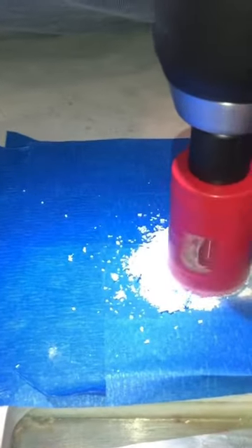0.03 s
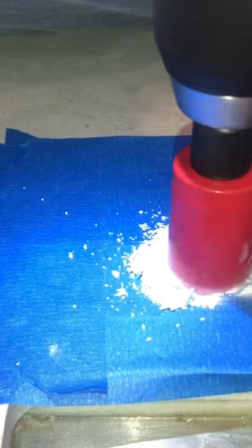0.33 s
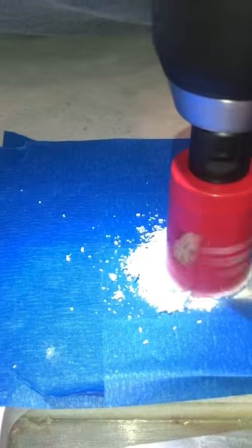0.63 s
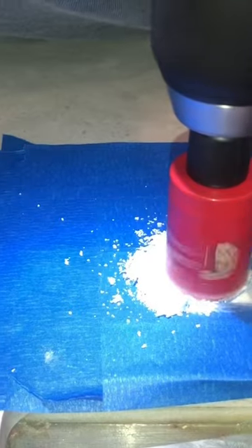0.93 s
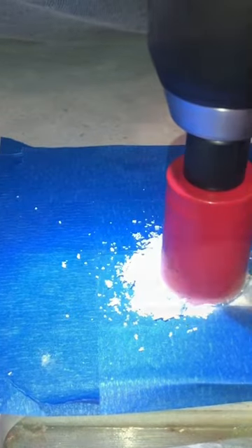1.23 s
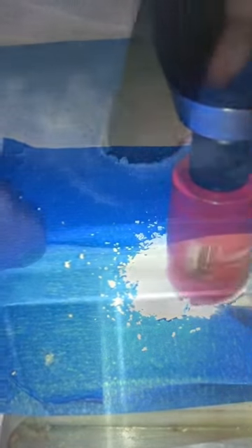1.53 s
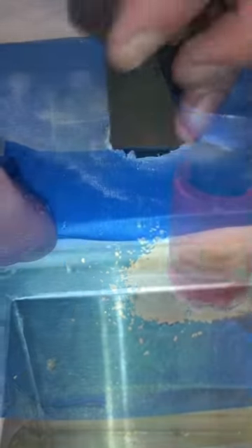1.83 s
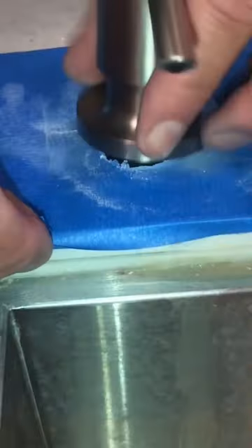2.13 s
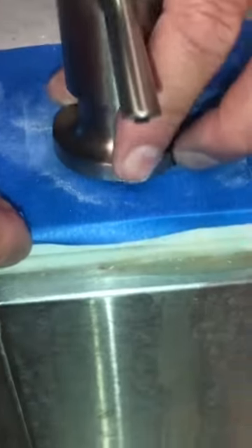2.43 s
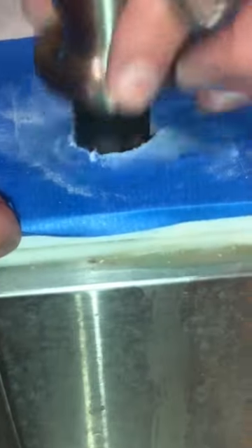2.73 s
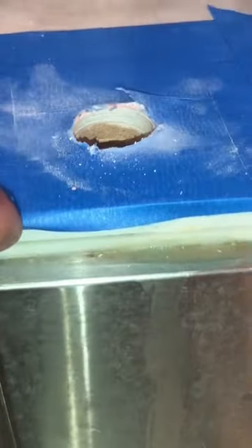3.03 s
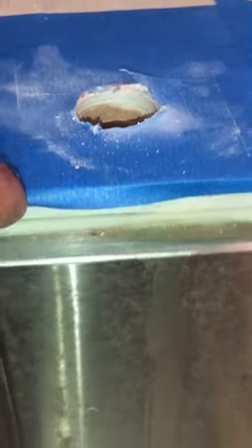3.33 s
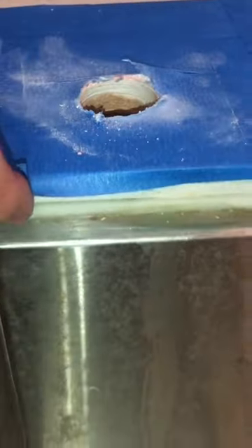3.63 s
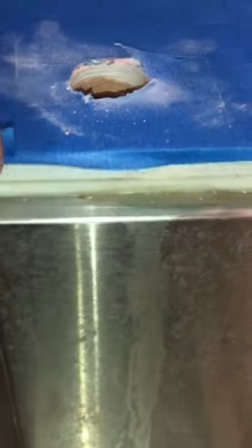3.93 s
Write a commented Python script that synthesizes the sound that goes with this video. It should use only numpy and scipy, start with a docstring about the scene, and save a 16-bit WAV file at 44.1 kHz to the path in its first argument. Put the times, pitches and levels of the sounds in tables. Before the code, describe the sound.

A power drill grinds through a countertop and fades, then a metal faucet knocks and clinks.

```python
"""A power drill grinds a hole saw through a countertop, slowing once a turn where the saw binds, then fades.
Its motor and gears whine at multiples of the shaft speed; abrasion gives noise and rings the saw's cup.
A steel faucet is set into the hole, scrapes back out and is put down with a few clinks: each impact
excites damped modes of slab, rim and steel, and the room reverberates briefly.
Under it lie quiet room noise and a faint falling whine, like a motor coasting down."""
import sys
import numpy as np
from scipy import signal
from scipy.fft import rfft, irfft, next_fast_len
from scipy.io import wavfile
from scipy.ndimage import uniform_filter1d, map_coordinates

SR = 44100
rng = np.random.default_rng(int(sys.argv[2]) if len(sys.argv) > 2 else 0)


def to_wav(sig):
    """Store sig (one row per channel, or 1-D mono) as 16-bit WAV at the path in sys.argv[1].

    Samples outside -1..1 are clipped; the rate is SR.
    """
    pcm = np.clip(np.atleast_2d(sig), -1, 1) * 32767
    pcm = np.round(pcm).astype(np.int16)
    wavfile.write(sys.argv[1], SR, pcm.T)  # frames by channels


N = 176400
TIME = np.arange(N) / SR

# spectrum of the room noise (frequency [Hz], relative level [dB])
AMBIENT_SPECTRUM = [(25, -15), (50, -6.5), (78, 2), (170, -5), (350, -11), (600, -12.5), (1500, -17.5),
                    (2300, -26.5), (5000, -30.5), (7000, -36.5), (16000, -42.5)]
# envelope of the room noise (time [s], level [dB])
AMBIENT_LEVEL = [(2.3, -52.5), (4, -54.5)]
# two falling whines, the second fainter; each lists (time [s], frequency [Hz], level [dB])
WHINE_GLIDES = [
    [(2.2, 1793, -58), (2.5, 1444, -53.5), (2.72, 1160, -60)],
    [(2.95, 1950, -74), (3.13, 1690, -61.5), (3.35, 1347, -78)],
]
# reverberation time (frequency [Hz], t60 [s])
ROOM_DECAY = [(150, 0.19), (2000, 0.31), (6000, 0.22), (14000, 0.087)]

# modes of the countertop, the hole's rim and the faucet (frequency [Hz], relative level [dB], t60 [s])
SLAB_MODES = [(110, -13.5, 0.14), (267, -4, 0.13), (369, -2.5, 0.14), (558, -7, 0.056)]
RIM_MODES = [(644, 3.5, 0.035), (973, -2.5, 0.07), (1205, -9, 0.053), (1520, -3.5, 0.052),
             (1840, -6, 0.029), (2310, -3.5, 0.041), (2507, -1, 0.033), (2970, -14, 0.025)]
STEEL_MODES = [(4270, -11, .07), (4600, -4, 0.067), (4950, -6.5, 0.13), (5300, -5, 0.09),
               (8170, -1.5, 0.061), (10970, -7.5, 0.026), (14600, -2, .035)]
# faucet impacts (time [s], thud gain [dB], clack gain [dB], tick gain [dB], contact brightness [Hz])
IMPACTS = [(2.19, -29, -34.5, -53, 910), (2.232, -36, -34, -26, 3600), (2.708, -28, -37, -37, 900),
           (2.776, -32, -23, -36.5, 1600), (2.7931, -22.5, -13.5, -23, 2010),
           (2.823, -22.5, -7, -18.5, 2070), (2.826, -32, -14.5, -43, 756), (2.87, -61, -31, -29.5, 2720),
           (3.216, -65, -44, -46, 2600), (3.3955, -53, -26, -10, 4300), (3.408, -41, -27, -16.5, 2010),
           (3.417, -27, -18.5, -23, 850), (3.4594, -43, -16, -9.5, 2400), (3.485, -48, -29, -25, 2300),
           (3.497, -34.5, -21.5, -46, 906), (3.547, -34, -16.5, -18, 1930), (3.551, -37, -15.5, -50, 670),
           (3.6128, -61, -29.5, -31, 2550)]
# clinks that leave the steel free to ring (time [s], gain [dB])
FREE_CLINKS = [(3.3951, -16), (3.407, -23)]
# the thread rasps over the rim (start [s], duration [s], gain [dB])
THREAD_RASPS = [(2.796, .024, -22.5)]
# dry slips as the shank starts to move (time [s], gain [dB])
SHANK_SLIPS = [(2.752, -8.5), (2.7568, 1), (2.766, -10), (2.781, -17), (2.790, -3)]
# fingers and steel rub on tape and counter (midpoint [s], half width [s], level [dB], centre [Hz])
RUB_STROKES = [(2.125, 0.02, -43.5, 298), (2.2, 0.1, -43.5, 150), (2.21, .04, -52, 10000),
               (2.704, 0.031, -51.5, 8750), (2.7, 0.026, -42.5, 328), (2.774, 0.027, -35.5, 10000),
               (2.813, 0.015, -28.5, 6510), (2.858, 0.027, -51, 1390), (3.414, 0.007, -37.5, 7950),
               (3.465, 0.05, -44.5, 5200), (3.815, 0.017, -56.5, 1550), (3.912, 0.011, -55.5, 11050),
               (3.985, 0.018, -56, 9040)]

# envelope of the drill (time [s], gain [dB])
DRILL_LEVEL = [(0, -16), (.1, -14), (1.25, -14.5), (1.5, -17.5), (1.75, -21.5), (1.98, -26.5), (2.12, -35),
               (2.28, -66)]
# motor speed (time [s], mean shaft rate [Hz], swing within a saw turn [Hz])
SHAFT_SPEED = [(0, 289.3, 4.5), (.45, 288.5, 4.2), (1.25, 291.3, 2), (2.1, 289.5, 1.7)]
# motor and gear whine (multiple of shaft rate [1], relative level [dB], swell on binding [dB])
SHAFT_ORDERS = [(2, -24.3, 0), (11, -15.5, 0), (11.8, -23, 1), (21, -16, -1), (22.5, -20, 3.5)]
# housing hum, then speed controller whistle (frequency [Hz], relative level [dB], wander [Hz], flutter [dB])
STEADY_TONES = [(182.6, -19, 3.4, 2.6), (3917.7, -14.3, 1.5, 1.3)]
# squeals where the saw binds hardest (midpoint [s], relative level [dB])
SAW_SQUEALS = [(.09, -7), (.315, -10), (.8, -12), (1.02, -10.5), (1.23, -9.5)]
# spectra of the cut and of its low rumble (frequency [Hz], relative level [dB])
GRIND_SPECTRUM = [(700, -13), (830, -4), (1050, -5.5), (1250, -3), (1400, -4.5), (2000, -6), (2300, -3),
                  (2600, -2.5), (3000, -8.5), (3400, -5.5), (3750, -8.5), (4200, -5.5), (4600, -10.5),
                  (5600, -9.5), (6400, -7), (7600, -10), (9000, -11), (9800, -8.5), (10400, -15.5),
                  (13500, -14), (14700, -8), (16000, -23.5)]
RUMBLE_SPECTRUM = [(40, -33), (75, -13), (120, -7), (175, -2), (210, -6.5), (245, -1), (280, -6),
                   (355, 4.5), (415, -9), (540, -5.5), (720, -10), (900, -21), (1500, -51.5)]
# resonances of the saw's cup (frequency [Hz], width [octaves], relative level [dB], surge [dB])
CUP_RESONANCES = [(1220, 0.055, -17, 4), (2413, 0.13, -10.5, 2.5), (4230, 0.039, -16, 1.5)]


def amp(db):
    """Decibels to amplitude ratio."""
    return 10 ** (np.asarray(db) / 20)


def unit(x):
    """Normalisation to rms 1."""
    return x / np.sqrt(np.mean(x ** 2) + 1e-20)


def along(points, hz):
    """Interpolation of (frequency, value) points on a log axis."""
    f, values = np.transpose(points)
    return np.interp(np.log(hz + 1), np.log(f + 1), values)


def curves(rows):
    """Linear interpolation in time of each column after the first."""
    times, *columns = np.transpose(rows)
    return [np.interp(TIME, times, column) for column in columns]


def random_spline(positions):
    """Spline interpolation between Gaussian values, one at each whole position."""
    return map_coordinates(rng.standard_normal(N // 20), [positions], mode="mirror")


def wobble(rate):
    """Smooth random modulation, rate knots a second."""
    return random_spline(TIME * rate)


def filtered(x, response):
    """Filtering as multiplication of the spectrum by a frequency response."""
    n = x.shape[-1]
    size = next_fast_len(n + 8192)
    return irfft(rfft(x, size) * response(np.fft.rfftfreq(size, 1 / SR)), size)[..., :n]


def noise(response):
    """Spectrally shaped noise of rms 1."""
    return unit(filtered(rng.standard_normal(N), response))


def band(centre_hz, octaves):
    """A Gaussian band-pass response on log frequency."""
    return lambda f: np.exp(-.5 * (np.log2((f + 1) / centre_hz) / octaves) ** 2)


def tone(hz):
    """A sine of rms 1 whose phase is the integral of its frequency."""
    return np.sqrt(2) * np.sin(2 * np.pi * (np.cumsum(hz) / SR + rng.random()))


def add(out, start_s, x):
    """Superposition of x on out from start_s."""
    i = round(start_s * SR)
    out[i:i + len(x)] += x[:max(N - i, 0)]


def room_noise():
    """Broadband ambient noise, strongest in the bass, with a thin narrowband hiss."""
    level_db, = curves(AMBIENT_LEVEL)
    floor = noise(lambda f: amp(along(AMBIENT_SPECTRUM, f))) * amp(level_db + .6 * wobble(5.8))
    return floor + amp(-79.5) * noise(band(9020, octaves=.016))


def falling_whines():
    """Fluttering downward glides; random frequency modulation blurs their three harmonics."""
    out = np.zeros(N)
    for glide in WHINE_GLIDES:
        hz, db = curves(glide)
        gate = uniform_filter1d(1. * ((TIME > glide[0][0]) & (TIME < glide[-1][0])), size=2000)
        fundamental = tone(hz + 12 * wobble(250))
        overtones = sum(tone(k * (hz + 90 * wobble(500))) for k in (2, 3))
        out += gate * (fundamental + amp(-17.5) * overtones) * amp(db + 3.2 * wobble(50))
    return out


def reverberation(x):
    """Convolution with a diffuse, exponentially decaying tail; the highest treble dies first."""
    hz, t, spectrum = signal.stft(rng.standard_normal(SR // 2), SR, nperseg=256)
    decay = amp(-60 * t / along(ROOM_DECAY, hz)[:, None])
    _, tail = signal.istft(spectrum * decay, SR, nperseg=256)
    delayed = np.pad(x, (SR // 200, 0))
    return signal.fftconvolve(delayed, tail / np.linalg.norm(tail))[:N]


def burst(t60, hz, octaves):
    """A contact transient: decaying band noise, coloured by the point of contact."""
    t = np.arange(SR // 4) / SR
    ripple_db, ripple_spacing_hz = 3.5, 350
    colour = lambda f: band(hz, octaves)(f) * amp(ripple_db * random_spline(f / ripple_spacing_hz))
    envelope = amp(-60 * t / t60) * (1 - np.exp(-t * hz))
    return unit(filtered(rng.standard_normal(len(t)), colour)) * envelope


def ring(modes, t60_scale=1, detune=0, relative_linewidth=.01):
    """Modal vibration: damped sines with phase diffusion, weighted anew by each contact."""
    t = np.arange(SR // 4) / SR
    out = np.zeros(len(t))
    for hz, db, t60 in modes:
        envelope = amp(db + rng.normal(0, 2.2) - 60 * t / (t60 * t60_scale)) * (1 - np.exp(-t * hz))
        shifted_hz = hz * (1 + detune * rng.normal())
        drift = np.cumsum(rng.standard_normal(len(t))) * np.sqrt(relative_linewidth * hz / SR / (2 * np.pi))
        out += envelope * np.sin(2 * np.pi * (shifted_hz * t + drift + rng.random()))
    return out


def knock(thud_db, clack_db, tick_db, hz):
    """Impact excites slab, rim and hand-damped steel; a harder contact is brighter."""
    grip_detune = .04
    thud = ring(SLAB_MODES) + amp(-5.5) * burst(t60=.051, hz=400, octaves=.9)
    clack = ring(RIM_MODES, detune=grip_detune) + amp(8.5) * burst(t60=.02, hz=hz, octaves=.51)
    held_steel = amp(-4.5) * ring(STEEL_MODES, t60_scale=.2, detune=grip_detune)
    tick = held_steel + burst(t60=.024, hz=2.3 * hz, octaves=.6)
    return amp(thud_db) * thud + amp(clack_db - 14.5) * clack + amp(tick_db - 6.5) * tick


def faucet(ridges_per_s=230):
    """Impact and friction: knocks, free clinks, the thread's train of small impacts, slips and rubs."""
    out = np.zeros(N)
    for s, thud_db, clack_db, tick_db, hz in IMPACTS:
        add(out, s, knock(thud_db, clack_db, tick_db, hz))
    for s, db in FREE_CLINKS:
        add(out, s, amp(db) * ring(STEEL_MODES))
    for start, duration, db in THREAD_RASPS:
        for s in np.arange(start, start + duration, 1 / ridges_per_s):
            onset = s + rng.normal(0, .00031)
            add(out, onset, knock(db - 8.5, db + 6.5, db - 18, hz=1400 * 2 ** rng.normal(0, .68)))
    for s, db in SHANK_SLIPS:
        add(out, s, amp(db) * burst(t60=.0016, hz=9600, octaves=.99))
    for s, width, db, hz in RUB_STROKES:
        friction = noise(band(hz, octaves=.87)) * amp(db + 3.1 * wobble(400))
        out += friction * np.exp(-((TIME - s) / width) ** 2)
    return out


def shaft_motion(turn_s=.232, fastest_s=.05, bind_lag_s=.035):
    """Periodic loading modulates the shaft rate once a saw turn; returns that rate and the binding cycle."""
    mean_hz, swing_hz = curves(SHAFT_SPEED)
    angle = 2 * np.pi * (TIME - fastest_s) / turn_s
    lopsided_cycle = np.cos(angle) + .3 * np.cos(2 * angle)
    shaft_hz = mean_hz + swing_hz * lopsided_cycle + .4 * wobble(40)
    bind = np.cos(angle - 2 * np.pi * bind_lag_s / turn_s) * swing_hz / swing_hz.max()
    return shaft_hz, bind


def motor(shaft_hz, bind):
    """Forced vibration: motor and gear orders track the shaft; housing and controller tones do not."""
    whine = sum(tone(order * shaft_hz) * amp(db + swell * bind + 1.6 * wobble(35))
                for order, db, swell in SHAFT_ORDERS)
    steady = sum(tone(hz + wander * wobble(35)) * amp(db + flutter * wobble(30))
                 for hz, db, wander, flutter in STEADY_TONES)
    return whine + steady


def saw_squeal(shaft_hz, order=22.5, blur_hz=45, half_width_s=.03):
    """Friction of the binding saw gives short, rough tones at a multiple of the shaft rate."""
    envelope = sum(amp(db) * np.exp(-((TIME - s) / half_width_s) ** 2) for s, db in SAW_SQUEALS)
    return tone(order * shaft_hz + blur_hz * wobble(400)) * envelope


def grinding(bind):
    """Abrasion: grit scours the kerf in fast uneven bites and excites the resonances of the saw's cup."""
    cut = lambda f: amp(along(GRIND_SPECTRUM, f)) / (1 + (740 / (f + 1)) ** 12)
    lowpass = lambda f: 1 / np.sqrt(1 + (f / 4200) ** 6)
    highpass = lambda f: np.sqrt(1 - lowpass(f) ** 2)
    housing_hz = STEADY_TONES[0][0]
    chatter = tone(housing_hz + 3 * wobble(12))
    bite = amp(.3 * bind + .51 * wobble(28) + .3 * wobble(500) + .5 * chatter)
    scour = noise(lambda f: cut(f) * lowpass(f)) * amp(-3)
    cup = sum(noise(band(hz, width)) * amp(db + surge * wobble(18))
              for hz, width, db, surge in CUP_RESONANCES)
    hiss = noise(lambda f: cut(f) * highpass(f)) * amp(-5 + .7 * bind + 1.3 * wobble(1100))
    rumble = noise(lambda f: amp(along(RUMBLE_SPECTRUM, f))) * amp(-14 + wobble(22))
    return bite * (scour + cup) + hiss + rumble


def drill():
    """Common modulation: motor, squeal and grinding share one rotation and one fading envelope."""
    level_db, = curves(DRILL_LEVEL)
    envelope = amp(level_db) * (TIME < DRILL_LEVEL[-1][0])
    shaft_hz, bind = shaft_motion()
    return envelope * (motor(shaft_hz, bind) + saw_squeal(shaft_hz) + grinding(bind))


def scene():
    """Superposition of the sources, alike in both channels; only the faucet reverberates."""
    handling = faucet()
    mono = drill() + handling + amp(-14.5) * reverberation(handling) + room_noise() + falling_whines()
    return np.array([mono, mono])


def record(dry):
    """Band limiting by a steep low-pass filter."""
    cutoff_hz = 16000
    return filtered(dry, lambda hz: 1 / np.sqrt(1 + (hz / cutoff_hz) ** 240))


dry = scene()
out = record(dry)
to_wav(out)
```